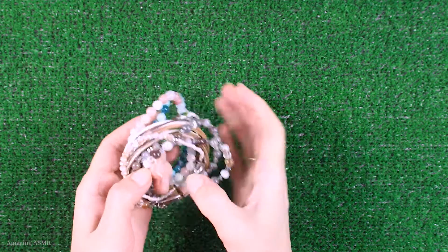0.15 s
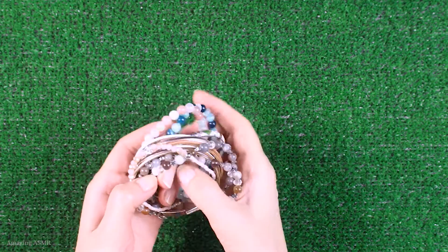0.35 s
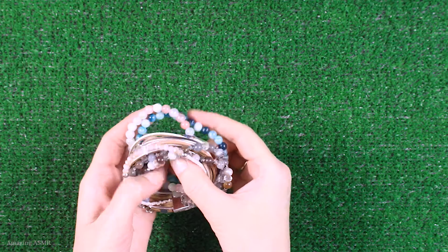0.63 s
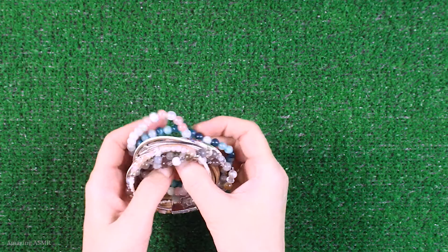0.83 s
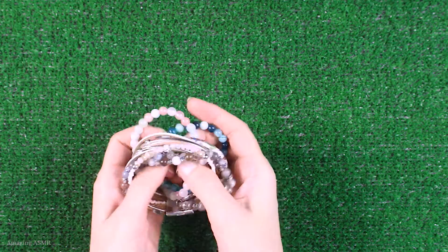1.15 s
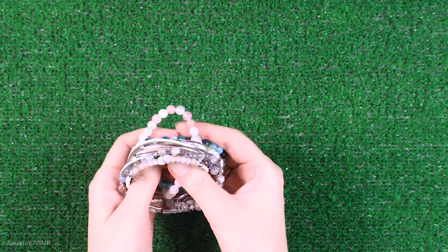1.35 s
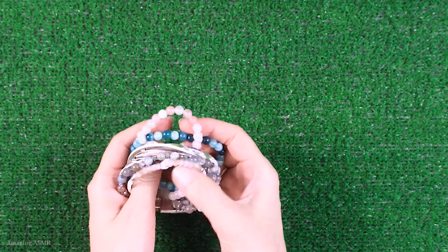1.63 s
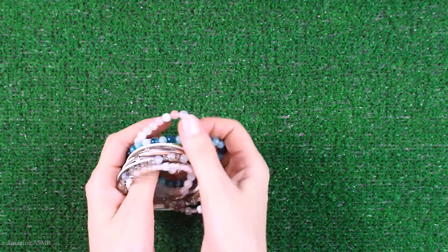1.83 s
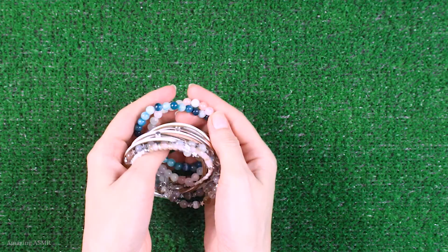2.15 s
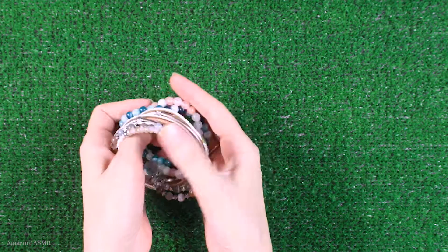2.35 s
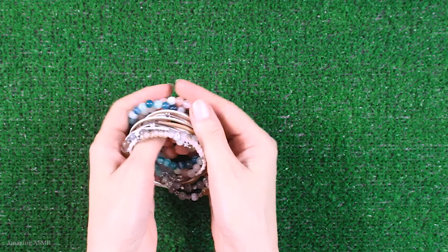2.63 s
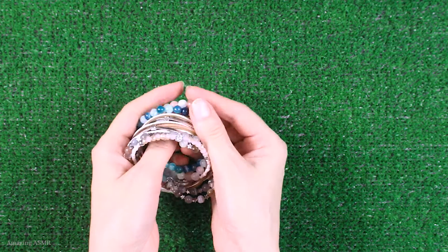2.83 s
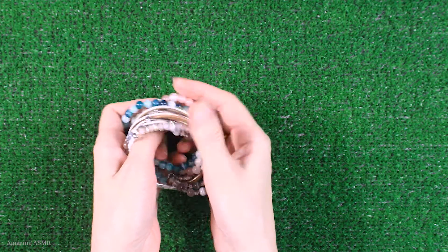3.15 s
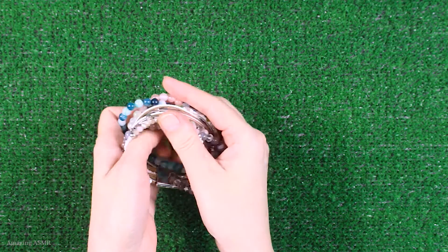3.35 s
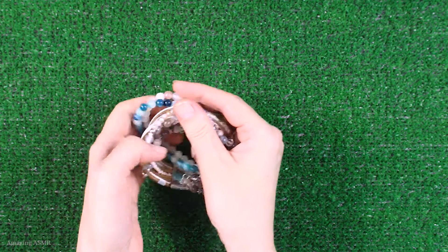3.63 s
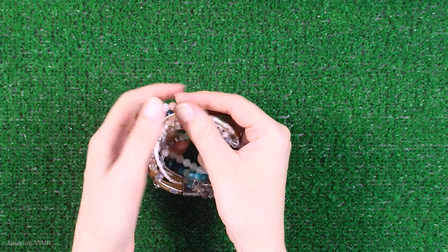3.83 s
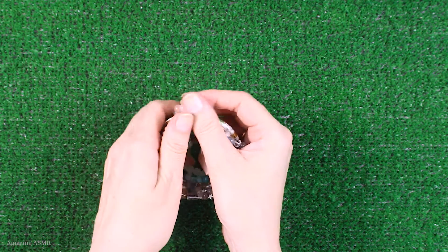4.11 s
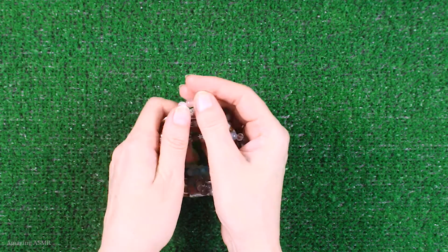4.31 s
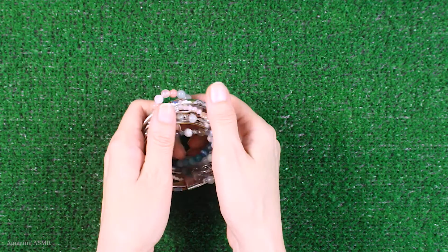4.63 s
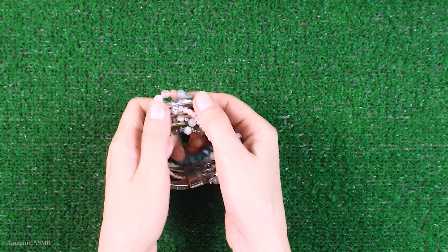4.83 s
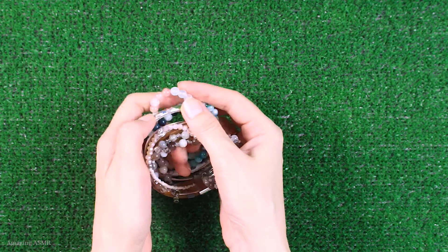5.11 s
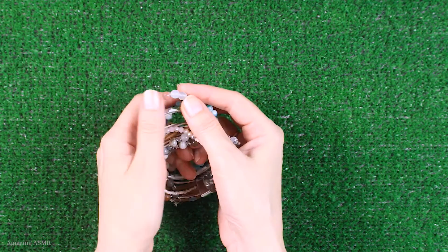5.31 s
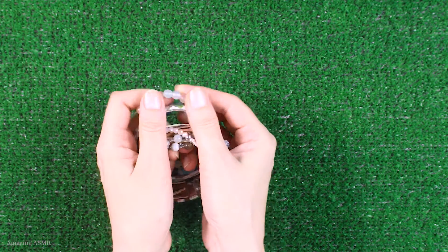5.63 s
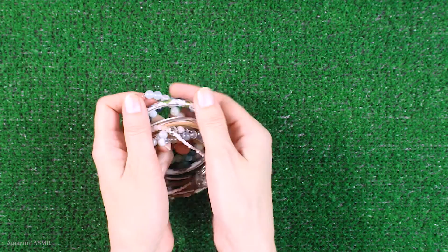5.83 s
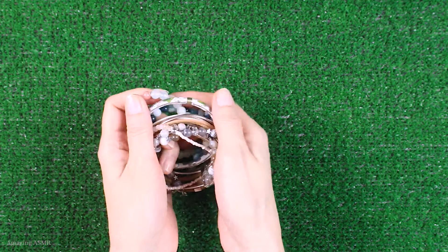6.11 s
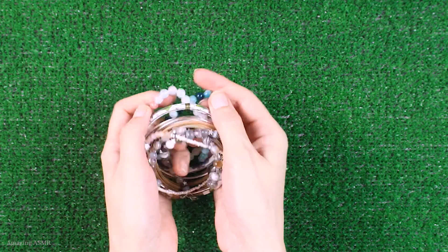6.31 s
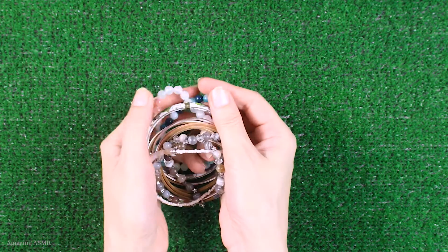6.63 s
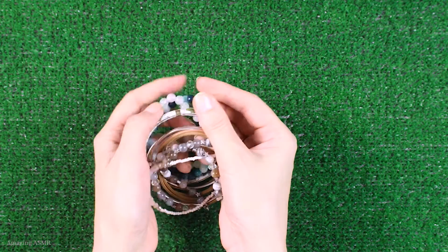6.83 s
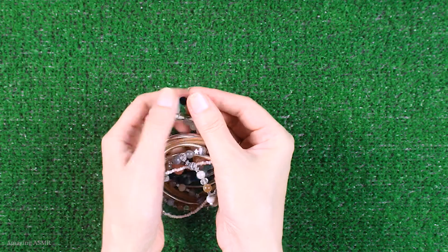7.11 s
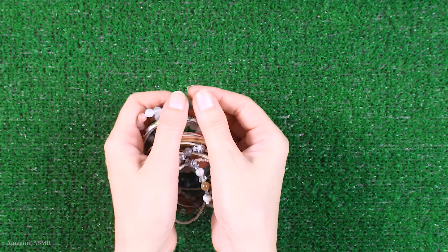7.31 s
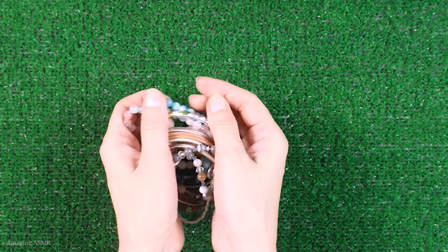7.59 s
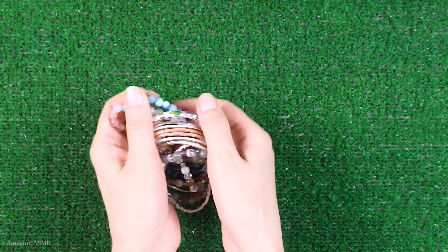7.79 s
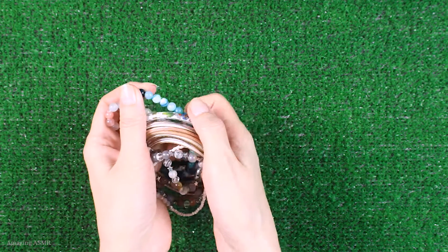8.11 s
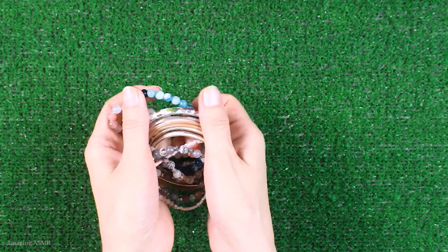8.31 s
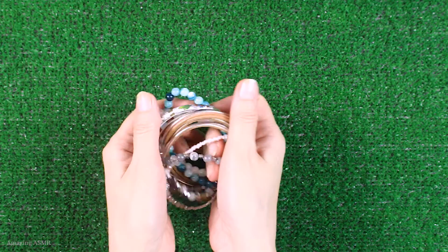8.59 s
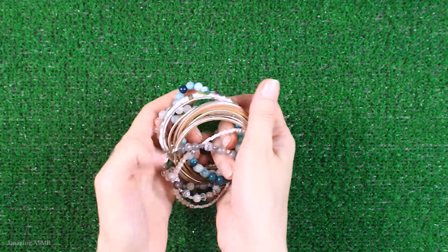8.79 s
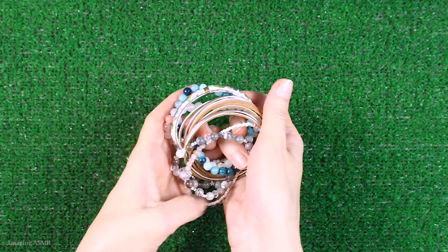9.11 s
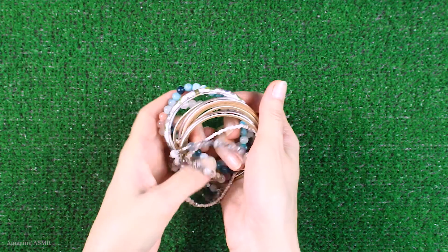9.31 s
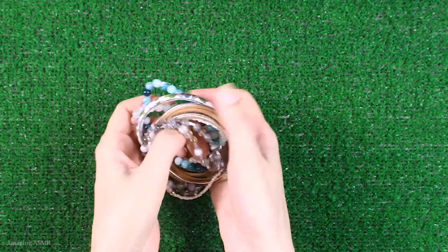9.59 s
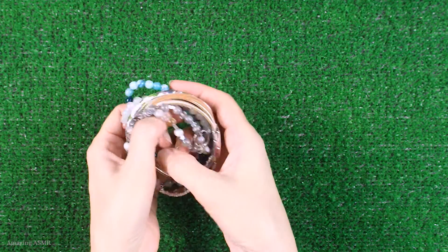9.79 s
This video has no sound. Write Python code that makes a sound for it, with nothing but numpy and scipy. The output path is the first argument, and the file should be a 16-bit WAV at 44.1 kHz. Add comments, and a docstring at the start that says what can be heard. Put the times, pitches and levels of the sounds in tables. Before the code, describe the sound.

A bundle of stone-bead bracelets and thin metal bangles is stirred between two hands very near the microphone. Bright, dry clacks come in uneven clusters over a fine patter of tiny ticks, swelling for about a second and then briefly resting. A few bangles knock dully against the palms, and one soft wooden bump sounds further off at two seconds. Faint rumble and hiss stay underneath, in a small quiet room.

```python
"""A bundle of stone-bead strings and thin metal bangles is turned and squeezed between two hands, near a microphone.
From the start, microphone rumble and hiss (shaped noise) lie under bead clacks and a patter of small ticks: damped
rings plus noise snaps, answered by a small quiet room. Later, bangles knock dully in the palms as short roughened
rings, and at about two seconds something bumps once further off: wooden modes set off by a push and a noisy shudder.
Strokes of patter and rests alternate to the end."""
import sys
import numpy as np
from scipy import signal
from scipy.fft import rfft, irfft, next_fast_len
from scipy.io import wavfile
from scipy.ndimage import uniform_filter1d

SR = 44100
rng = np.random.default_rng(int(sys.argv[2]) if len(sys.argv) > 2 else 0)


def to_wav(s):
    """Save 16-bit WAV."""
    ch = np.atleast_2d(s).T  # columns
    pcm = np.round(np.clip(ch, -1, 1) * 32767)  # PCM
    wavfile.write(sys.argv[1], SR, pcm.astype(np.int16))


N = 438794

# Spectrum shape of the steady rumble and hiss: (frequency [Hz], relative density [dB per Hz])
HUSH_SPECTRUM = [(20, 3), (46, -4.5), (200, -17.5), (930, -30), (3000, -37), (10000, -28), (16500, -43.5)]
# The loud bead clacks: (time [s], level [dB], brightness [dB per octave])
CLACKS = [(0.0158, -36.5, 6.5), (0.064, -46.5, 12), (0.1256, -35, 5), (0.2605, -40, 12.5),
          (0.4711, -35, -2.5), (0.5541, -38.5, -1), (0.6547, -47, -7), (0.6985, -45.5, -6),
          (0.736, -45.5, -3), (0.7949, -38.5, -2), (0.817, -35, 13), (0.8207, -41, 5), (0.825, -37.5, -2),
          (0.8811, -27, 3), (0.9015, -33.5, 13), (0.9346, -35, -1), (0.9536, -20.5, 12.5),
          (0.9696, -27, -1), (0.9862, -38.5, -6), (1.0325, -23, 9.5), (1.0659, -36.5, 10),
          (1.111, -41.5, -4), (1.1173, -43, 11), (1.172, -40, 10), (1.1831, -37.5, 4.5), (1.236, -40.5, 0),
          (1.26, -34.5, 2.5), (1.27, -36.5, -3), (1.2826, -34.5, 1), (1.294, -31, 3.5), (1.3278, -38.5, 5),
          (1.339, -42, 6), (1.4048, -38, 2), (1.4226, -22.5, 6.5), (1.4356, -26, -2), (1.459, -33, 3),
          (1.465, -32.5, -4), (1.5367, -45.5, -3), (1.616, -34, -3.5), (1.6676, -38.5, 4),
          (1.6709, -33.5, 3), (1.676, -46.5, 1), (1.6794, -33.5, -0.5), (1.7562, -31.5, 2),
          (1.7882, -36.5, 2), (1.9356, -34, -2.5), (1.9524, -27, -2.5), (1.985, -33.5, 10),
          (2.0055, -37, -1), (2.0193, -34.5, 4), (2.0941, -32.5, -2.5), (2.1095, -29, 3.5),
          (2.1296, -38.5, 1.5), (2.137, -36.5, 1), (2.1581, -34, -1), (2.2009, -31, 3), (2.2063, -37, 0.5),
          (2.2213, -36, -2), (2.2801, -41, -2), (2.2841, -29, -6), (2.2924, -34.5, -1), (2.3473, -44, -2.5),
          (2.4069, -23, 6), (2.4141, -31.5, 9), (2.4215, -37, 9.5), (2.4303, -37, -1), (2.4347, -40, -0.5),
          (2.454, -41, 1), (2.5232, -41.5, 4.5), (2.5739, -35.5, 0.5), (2.5923, -34, 13),
          (2.7031, -33.5, 2), (2.7502, -40, 2), (2.7643, -38.5, 7), (2.8049, -34.5, 7), (2.842, -36, 8.5),
          (2.9553, -46.5, 1.5), (3.0865, -45, 11), (3.1489, -35.5, 8), (3.1784, -34.5, 13),
          (3.2637, -40, -1.5), (3.321, -40, -3), (3.4677, -49.5, 9), (3.5007, -39.5, 5), (3.5264, -47, 4),
          (3.5622, -42, 2), (3.6955, -42, 1), (3.7898, -26.5, 4), (3.8062, -34, 4.5), (3.8123, -38.5, -4.5),
          (3.8203, -37.5, -13), (3.8236, -35, -1), (3.9776, -50, 4), (3.9817, -49, 2), (3.999, -46, 13),
          (4.005, -44, 11), (4.0389, -37.5, -8), (4.066, -45, -6), (4.0887, -46, -1.5), (4.158, -46.5, 11),
          (4.218, -41.5, -1), (4.2653, -43, -4), (4.2917, -33.5, -2), (4.3174, -27, 4.5), (4.3363, -33, 6),
          (4.4148, -40.5, 5.5), (4.4324, -40, -13.5), (4.5452, -41, 0), (4.5601, -38.5, -3),
          (4.6365, -37, 13), (4.6416, -40, -5), (4.675, -29, 8), (4.6794, -36.5, -1), (4.692, -29.5, 0),
          (4.7173, -34, -4), (4.7242, -32.5, 8.5), (4.7662, -35, 7), (4.7866, -34, 0.5), (5.0165, -41.5, 3),
          (5.0507, -30.5, 5), (5.0853, -37, 7), (5.0923, -36, -6), (5.0988, -31.5, 2), (5.126, -35.5, -2),
          (5.1783, -33.5, 2), (5.2029, -32.5, 0), (5.262, -43, 4), (5.278, -44, -3.5), (5.3136, -40, -4),
          (5.3177, -39, 7), (5.3234, -40.5, 4), (5.6757, -40, 7), (5.7291, -43, 4.5), (5.7728, -33.5, -4),
          (5.7825, -31, 2), (5.8483, -45, 4), (5.854, -35.5, 4), (5.9259, -34.5, 2), (5.981, -32.5, -3.5),
          (5.9985, -38.5, -5), (6.04, -34, 6), (6.0559, -40.5, 4), (6.1136, -41.5, 2.5), (6.132, -45, -5),
          (6.205, -27, 2.5), (6.267, -47, -2.5), (6.3356, -49, -4), (6.343, -28.5, 2), (6.3616, -38, -1.5),
          (6.371, -30, -1), (6.3796, -36.5, 0), (6.411, -30, -2.5), (6.4449, -30.5, 2), (6.452, -33, -5),
          (6.4704, -19, 10.5), (6.4751, -23.5, -1), (6.5815, -24.5, 10), (6.5902, -36, 13),
          (6.6054, -32.5, -0.5), (6.663, -41.5, 1), (6.6862, -31, 3), (6.7372, -37.5, -3.5),
          (6.802, -37, 5), (6.818, -36, 5.5), (6.8244, -38.5, 4.5), (6.9294, -40, -5.5), (6.9385, -35, 0.5),
          (6.9463, -33, -2), (6.961, -27.5, 6), (6.9778, -31, 1), (6.9965, -31.5, 10), (7.0081, -35, -1.5),
          (7.0325, -42, 1), (7.0893, -25, -0.5), (7.1001, -24, -4), (7.1147, -31.5, 6), (7.1198, -35, -10),
          (7.1307, -39, 3), (7.1471, -39, 10), (7.1903, -38.5, 0), (7.2219, -40.5, -4.5), (7.2614, -43, 6),
          (7.2826, -30, -3), (7.3362, -39, 3.5), (7.4343, -42.5, 7.5), (7.64, -39.5, 11.5),
          (7.6578, -43.5, 5), (7.7299, -34.5, 1), (7.7375, -34.5, -3), (7.751, -35, 2), (7.7873, -28, 5),
          (7.8638, -45, 1), (7.8681, -42.5, -6.5), (7.8853, -37.5, 2.5), (7.9575, -36, -4.5),
          (8.0475, -32, -1), (8.0728, -37, -13.5), (8.0775, -30, 4), (8.0943, -35.5, -6),
          (8.1173, -35.5, 3), (8.1836, -48.5, -3), (8.2075, -38, -5), (8.2672, -34, 1), (8.3077, -44, -5),
          (8.3208, -40.5, -7), (8.383, -49.5, 3.5), (8.4313, -49.5, -6), (8.4724, -41, -1),
          (8.489, -30.5, 1), (8.4945, -25.5, 6.5), (8.5114, -31.5, 1), (8.572, -39, -3),
          (8.5805, -35.5, -1.5), (8.6144, -35, 1), (8.6211, -39, -7), (8.6257, -32, 0), (8.6738, -25.5, -7),
          (8.6875, -31, 3), (8.728, -38.5, 1), (8.805, -42, -4), (8.8174, -35.5, -4.5), (8.9775, -37.5, -5),
          (8.9859, -37.5, 1.5), (8.9993, -45, -8), (9.0289, -36.5, 0.5), (9.1026, -41.5, -6),
          (9.1196, -40, -2.5), (9.2703, -47.5, 1), (9.4344, -31, 5.5), (9.443, -42, 3), (9.4784, -37.5, 1),
          (9.491, -31.5, 3), (9.4982, -29, -2.5), (9.5045, -36.5, -9), (9.5153, -43.5, 10),
          (9.5327, -37.5, 5), (9.5943, -35, 12), (9.6328, -34.5, 5.5), (9.6437, -26.5, 16),
          (9.652, -28, 4.5), (9.6609, -46.5, 1), (9.7662, -40, 13), (9.774, -35, 10.5), (9.782, -32.5, 6),
          (9.79, -33, 5), (9.8644, -43, -3), (9.885, -36.5, 1.5), (9.9217, -37, -10.5), (9.9407, -39, 1),
          (9.9482, -26.5, 2)]
# Modes rung by a contact of two beads: (frequency [Hz], relative level [dB], 60 dB decay time [s])
BEAD_MODES = [(1680, -52.5, 0.045), (3122, -24.5, 0.013), (4520, -10, 0.0066), (5420, 2.5, 0.0052),
              (6940, -1.5, 0.003), (8056, -6, 0.0027), (9460, -8, 0.0078), (12010, -2, 0.0071),
              (13230, 0.5, 0.0051), (13520, 0, 0.0057)]
# Colour of the noisy snap as bead surfaces meet: (frequency [Hz], relative level [dB])
SNAP_SPECTRUM = [(2400, -41), (3800, -25), (4800, -5), (8200, 7), (10500, -2), (13000, 1.5), (15500, -5.5),
                 (16700, -32)]
# The fingers stir the bundle in strokes and rest between them:
# (start [s], end [s], level of the strongest ticks [dB], brightness [dB per octave])
STROKES = [(-.1, 0.11, -51, 4.5), (0.434, 0.594, -55, 1.5), (0.654, 1.75, -56, 2.5), (1.86, 2.848, -53, 1),
           (3.08, 3.826, -50.5, 3.5), (3.97, 4.785, -49, 0), (4.858, 5.4, -53.5, 2),
           (5.606, 6.256, -50.5, 2), (6.33, 6.82, -53.5, 2), (6.915, 7.417, -60.5, 1),
           (7.62, 9.09, -50.5, 0.5), (9.377, 9.692, -45, 1.5), (9.76, 10.1, -45, -0.5)]
# Decay of the room: (frequency [Hz], 60 dB decay time [s])
ROOM_DECAY = [(3000, 0.3), (15000, 0.067)]
# Dull knocks of bangles on the palms: (time [s], level before a small gain [dB], pitch [Hz])
KNOCKS = [(0.824, -59.5, 1630), (0.8824, -61.5, 1760), (0.954, -63, 1620), (1.0321, -65, 1760),
          (1.258, -67, 1750), (1.4334, -59, 1520), (2.004, -64, 1870), (4.3162, -55, 2200),
          (5.097, -62, 1940), (6.2005, -43.5, 2430), (6.233, -59.5, 1940), (6.3626, -70.5, 1600),
          (6.4373, -56.5, 2000), (6.477, -45.5, 2270), (7.776, -61.5, 1840), (7.839, -59, 1840),
          (8.0226, -50, 2360), (8.6727, -70, 1940), (9.499, -48, 2480)]
# The one distant bump: (time [s], drive level [dB])
BUMP = (2.042, -47.5)
# Wooden modes rung by the bump: (frequency [Hz], relative level [dB], 60 dB decay time [s])
WOOD_MODES = [(278, 8, 0.014), (437, -3, 0.051), (732, -11.5, 0.056), (850, -7, 0.035), (1124, 7, 0.016),
              (1400, -12, 0.025)]

RISE_DB_PER_S, FALL_DB_PER_S, REST_DB = 395, 247, -78.5  # how the patter swells, settles and rests
SHAKE_DB, SHAKE_S = -16, 0.025  # rattle after a clack: level relative to it, time to fall to 1/e
# Ring time at the reference pitch; higher knocks are glancing and die faster by this power
KNOCK_T60_S, KNOCK_HZ, GLANCING = 0.026, 1785, 3.2
OVERTONE_RATIO, OVERTONE_DB = 1.7, -6  # the bangle's second mode: pitch ratio, relative level
TOP_HZ = 16800  # band limit


def amp(db):
    """Decibels to linear gain."""
    return 10 ** (np.asarray(db) / 20)


def along(points, hz):
    """Interpolate (frequency [Hz], value) points on a log frequency axis."""
    f, v = np.transpose(points)
    return np.interp(np.log(hz + 1), np.log(f), v)


def filtered(x, response):
    """Shape x by a gain that depends on frequency, along its last axis."""
    m = next_fast_len(x.shape[-1] + 512)
    spectrum = rfft(x, m) * response(np.fft.rfftfreq(m, 1 / SR))
    return irfft(spectrum, m)[..., :x.shape[-1]]


def placed(s, sounds):
    """Mix one row of samples in at each start time [s]."""
    at = np.round(s * SR).astype(int)[:, None] + np.arange(sounds.shape[1])
    return np.bincount(at.ravel(), sounds.ravel(), N + SR)[:N]


def ring(hz, t60, t, attack):
    """A mode struck once: a damped sine with a soft start."""
    return np.sin(2 * np.pi * hz * t) * amp(-60 * t / t60) * (1 - np.exp(-(t / attack) ** 2))


def hush():
    """The microphone's own steady rumble and hiss: noise shaped to a fixed spectrum."""
    noise = filtered(rng.standard_normal(N), lambda hz: amp(along(HUSH_SPECTRUM, hz)) * (hz > 8))
    return amp(-73.5) * noise / np.std(noise)


def contacts(s, db, bright_db):
    """Each contact rings other beads, so pitches and strengths are new; the pair chatters before it rests."""
    t = np.arange(SR // 100) / SR

    def tilt(hz):
        """Small hard beads sound brighter."""
        return amp(bright_db[:, None] * np.log2(np.clip(hz, 2600, None) / 7500))

    luck = rng.standard_normal((len(s), len(BEAD_MODES), 2, 1))
    rings = 0
    for k, (hz, level, t60) in enumerate(BEAD_MODES):
        strength = amp(level + 2.92 * luck[:, k, 0])
        pitch = hz * np.exp(0.044 * luck[:, k, 1])
        rings = rings + tilt(hz) * strength * ring(pitch, t60, t, 1.57 / hz)

    # The surfaces snap as they meet
    burst = rng.standard_normal(rings.shape) * amp(-60 * t / 0.0051) * (1 - np.exp(-(t / 0.00028) ** 3))
    snap = filtered(burst, lambda hz: tilt(hz) * amp(along(SNAP_SPECTRUM, hz)))
    sound = rings + amp(12.5) * snap
    onset_rms = np.sqrt(np.mean(sound[:, :SR // 440] ** 2, axis=1, keepdims=True))
    sound *= amp(db - 3.0)[:, None] / onset_rms

    # Six further touches within 6 ms; later ones tend to be weaker
    late = 0.006 * rng.random((len(s), 6)) ** 2
    weak_db = -6 - 60 * late / 0.024 - 8 * rng.random(late.shape)
    # The touches share the blow's energy
    sound /= np.sqrt(1 + np.sum(amp(weak_db) ** 2, axis=1, keepdims=True))
    chatter = sum(placed(s + lag, sound * amp(g)[:, None]) for lag, g in zip(late.T, weak_db.T))
    return placed(s, sound) + chatter


def stir(s):
    """Patter level and brightness at times s: the prevailing stroke, plus the rattle after each loud clack."""
    start, end, level_db, bright_db = np.transpose(STROKES)[:, :, None]
    swell_db = RISE_DB_PER_S * np.clip(start - s, 0, None)
    settle_db = FALL_DB_PER_S * np.clip(s - end, 0, None)
    stroke_db = level_db - swell_db - settle_db
    at, clack_db, _ = np.transpose(CLACKS)[:, :, None]
    dying = np.exp(-np.abs(s - at) / SHAKE_S) * (s > at)
    rattle = np.max(amp(clack_db + SHAKE_DB) * dying, axis=0)
    total = amp(REST_DB) + amp(stroke_db.max(axis=0)) + rattle
    return 20 * np.log10(total), bright_db[stroke_db.argmax(axis=0), 0]


def patter(rate=230):
    """Small bead ticks at random moments, rate per second, spread over 24 dB below the stirring level."""
    luck = rng.random((int(rate * N / SR), 2))
    s = luck[:, 0] * N / SR
    db, bright_db = stir(s)
    tick_db = db - 24 * luck[:, 1] ** 1.09
    return contacts(s, tick_db, bright_db + 5.7 * rng.standard_normal(len(s)))


def room(x):
    """Short diffuse echoes, then a quiet small-room decay, made of noise tails that fade faster in the treble."""
    hz, t, z = signal.stft(rng.standard_normal((4, SR // 4)), SR, nperseg=128)
    decay = amp(-60 * t / along(ROOM_DECAY, hz)[:, None])
    diffuse = amp(-0.5 - 60 * t / 0.049)
    tails = signal.istft(z * (decay + diffuse), SR, nperseg=128)[1]
    tails = tails / np.linalg.norm(tails[0])
    # Four random tails alternate so that no single one colours every click:
    # each turn lasts 1536 samples, crossfaded over 768
    turn = 1.0 * (np.arange(N) // 1536 % 4 == np.arange(4)[:, None])
    shared = x * uniform_filter1d(turn, size=768)
    return signal.fftconvolve(shared, tails, axes=1)[:, :N].sum(axis=0)


def knocks():
    """Skin damps the bangle at once: a short low ring, roughened as it slides."""
    s, db, hz = np.transpose(KNOCKS)[:, :, None]
    t = np.arange(SR // 30) / SR
    slide = 3 * uniform_filter1d(rng.standard_normal((len(s), len(t))), size=80)
    t60 = KNOCK_T60_S * (KNOCK_HZ / hz) ** GLANCING
    first = ring(hz, t60, t, 0.0013)
    second = amp(OVERTONE_DB) * ring(OVERTONE_RATIO * hz, t60, t, 0.0013)
    return placed(s[:, 0], amp(db + 2) * (first + second) * (1 + slide))


def bump():
    """A soft blow on wood away from the hands: one push, then a shudder that keeps the wood sounding."""
    t = np.arange(SR // 4) / SR
    hz, db, t60 = np.transpose(WOOD_MODES)[:, :, None]
    wood = np.sum(amp(db) * ring(hz, t60, t, 0.003), axis=0)
    drive = rng.standard_normal(len(t)) * amp(-27.5 - 60 * (t / 0.19) ** 1.57)
    drive[0] = 1  # the push
    thud = signal.fftconvolve(wood, drive)[None, :len(t)]
    return placed(np.array(BUMP[:1]), amp(BUMP[1]) * thud)


def scene():
    """Mix the layers; the room answers the beads and, at half strength, the bangles."""
    beads = contacts(*np.transpose(CLACKS)) + patter()
    # Bodies this small radiate no bass
    beads = signal.sosfilt(signal.butter(2, 1500, 'high', fs=SR, output='sos'), beads)
    bangles = knocks()
    echoes = amp(-11) * room(beads + 0.5 * bangles)
    return (beads + echoes + bangles + bump() + hush())[None]


def record(dry):
    """Nothing is kept above the band limit."""
    return filtered(dry, lambda hz: hz < TOP_HZ)


dry = scene()
out = record(dry)
to_wav(out)
```